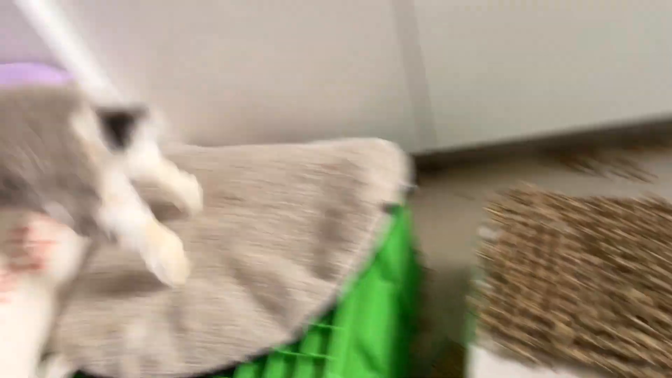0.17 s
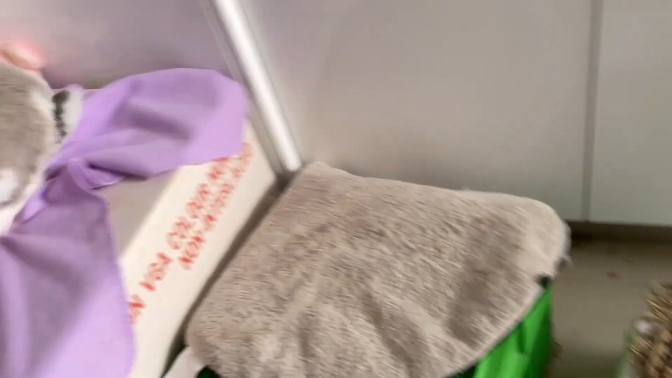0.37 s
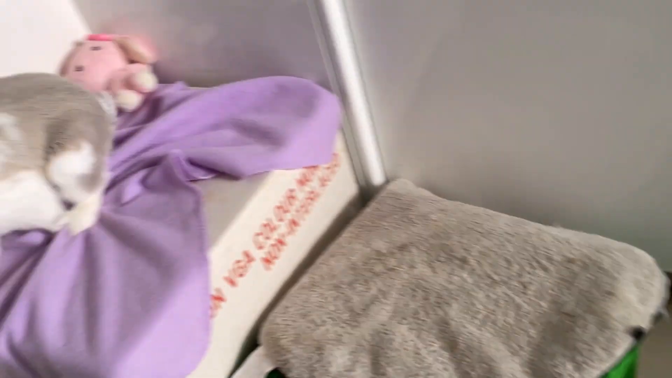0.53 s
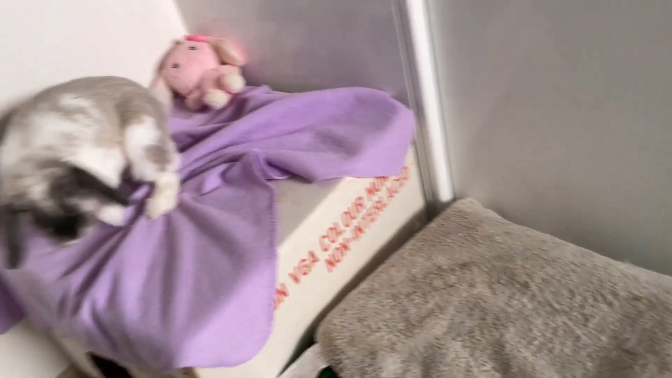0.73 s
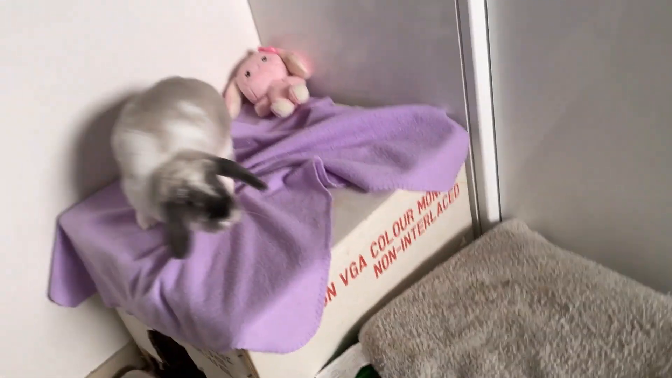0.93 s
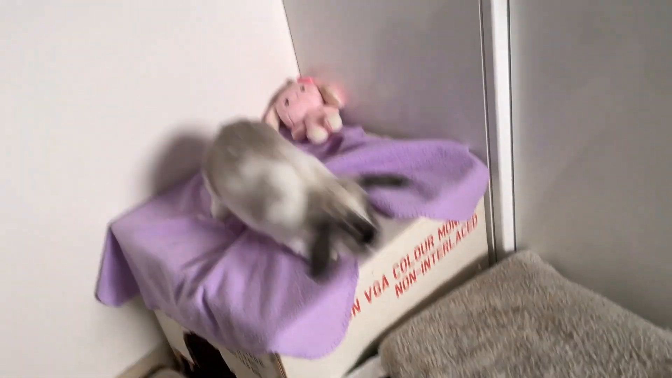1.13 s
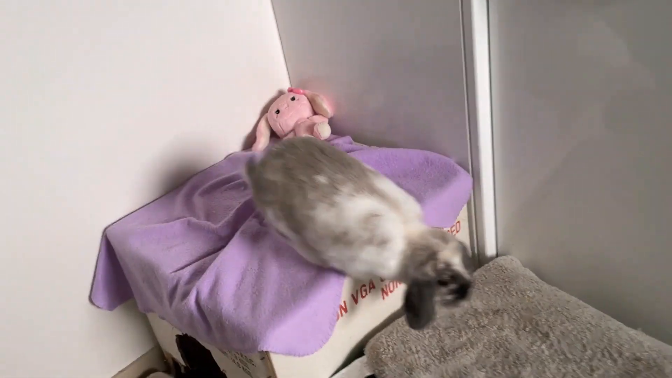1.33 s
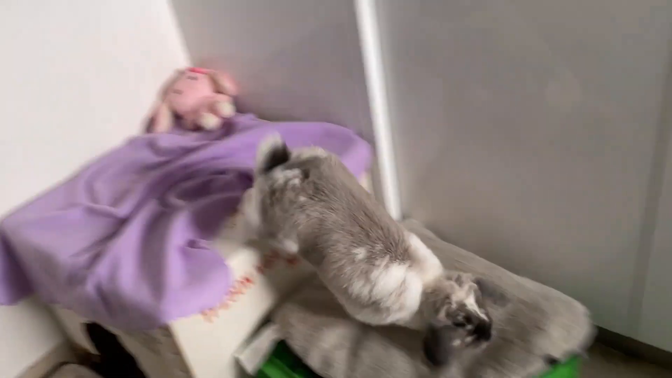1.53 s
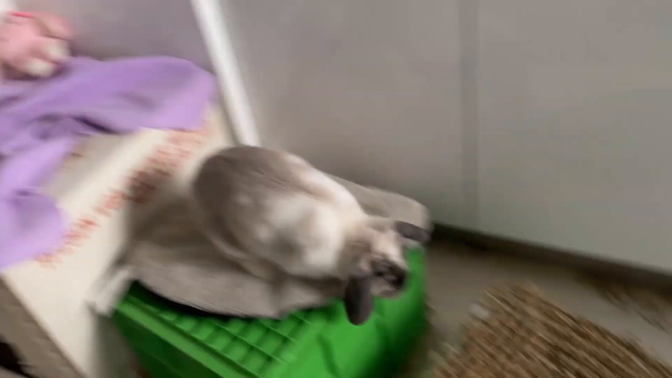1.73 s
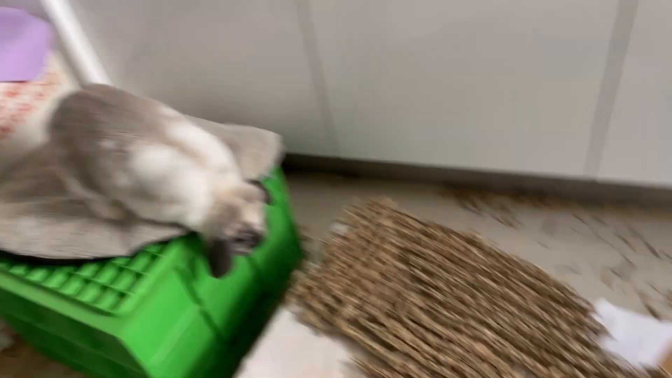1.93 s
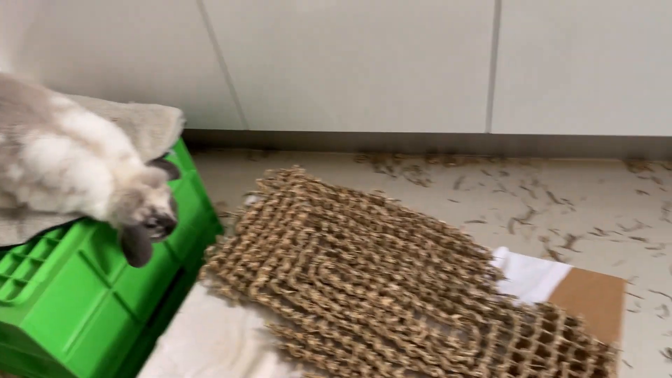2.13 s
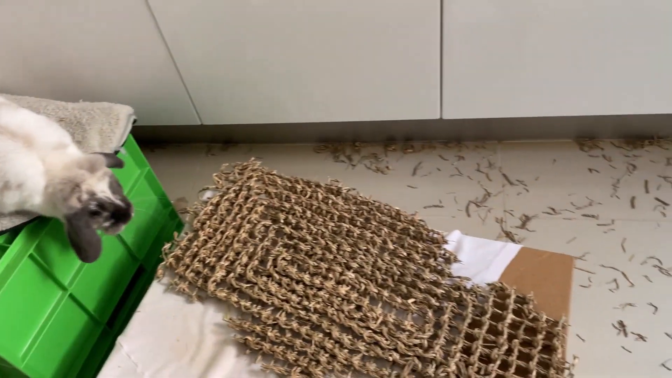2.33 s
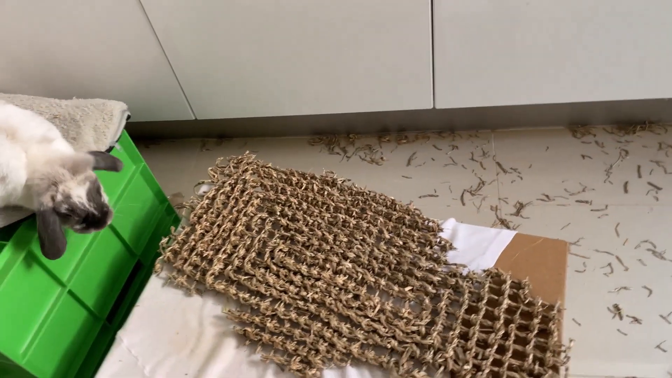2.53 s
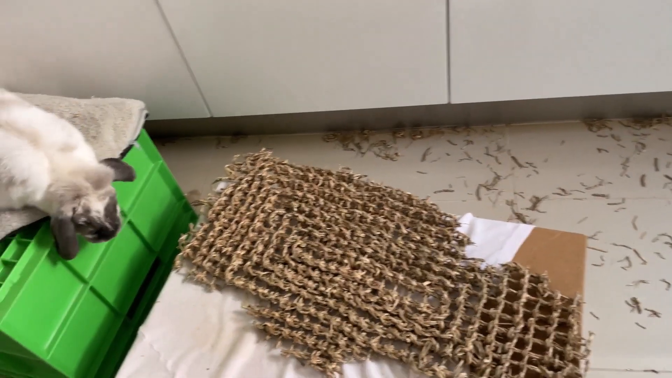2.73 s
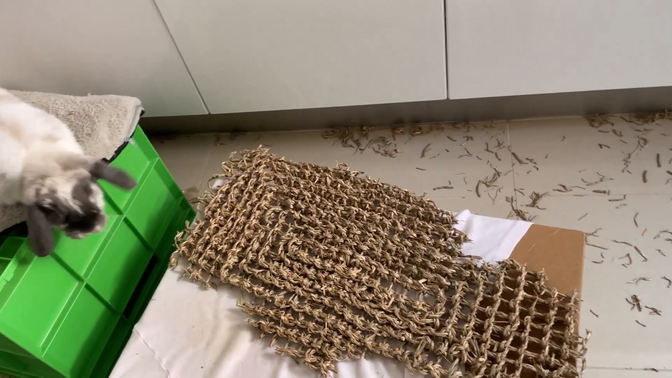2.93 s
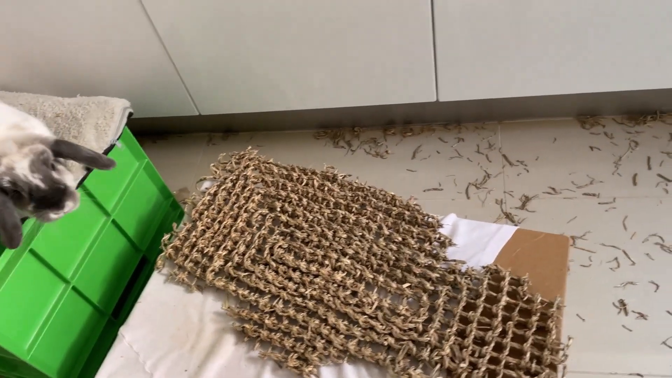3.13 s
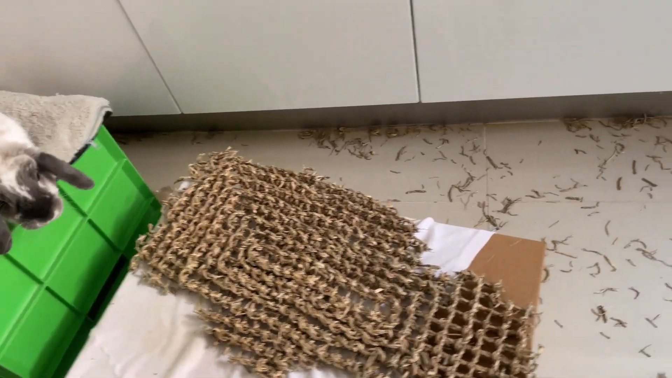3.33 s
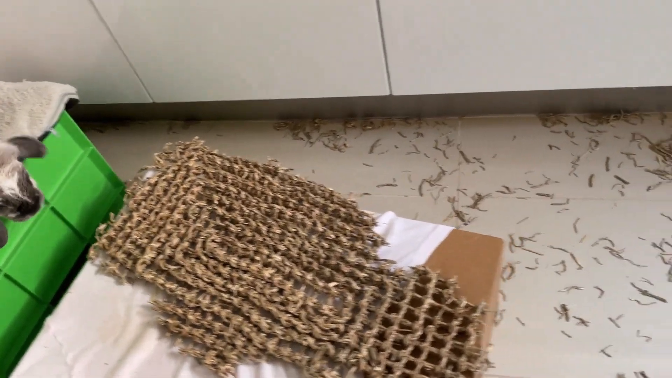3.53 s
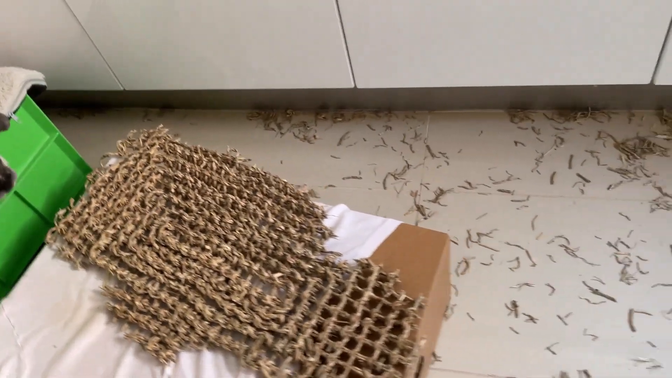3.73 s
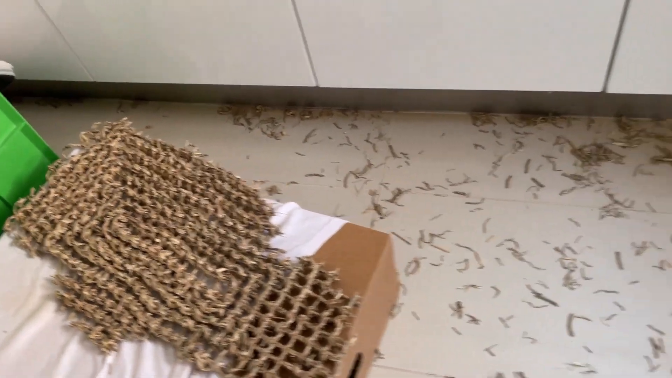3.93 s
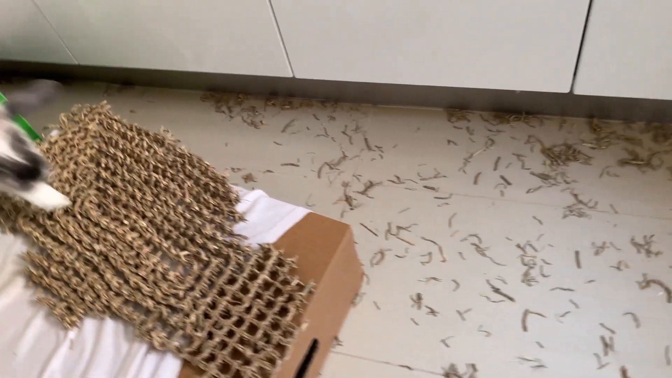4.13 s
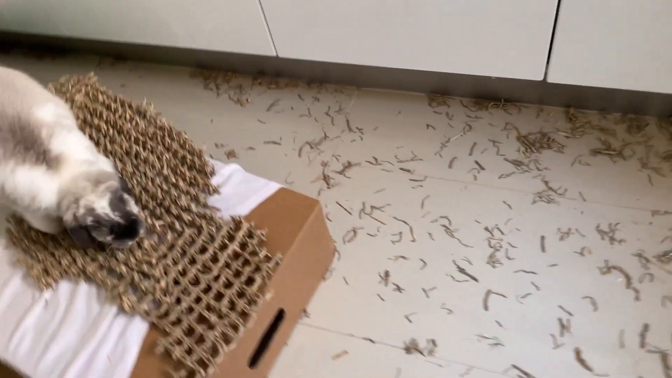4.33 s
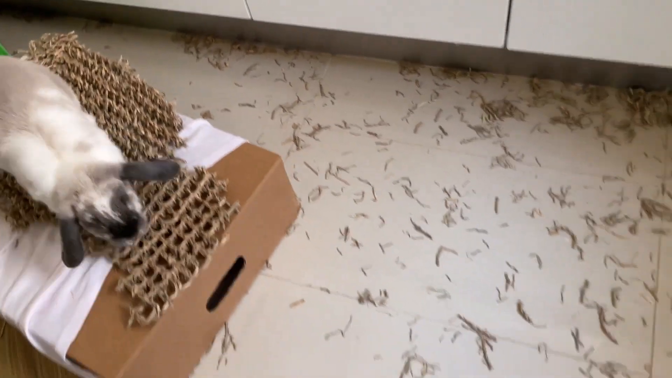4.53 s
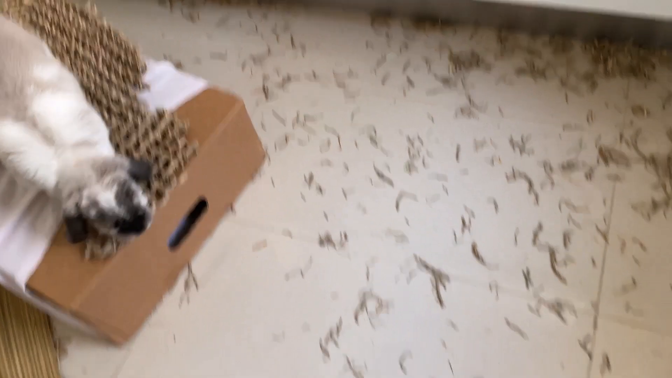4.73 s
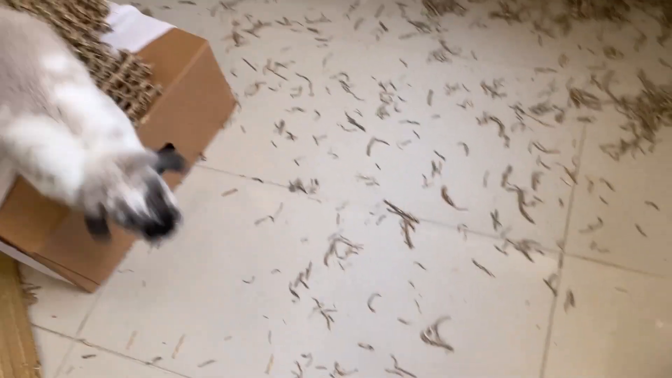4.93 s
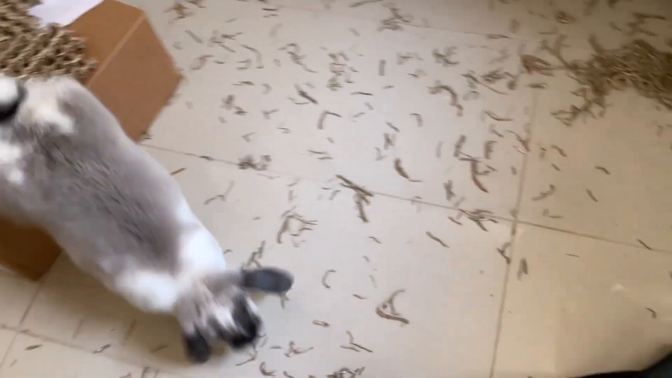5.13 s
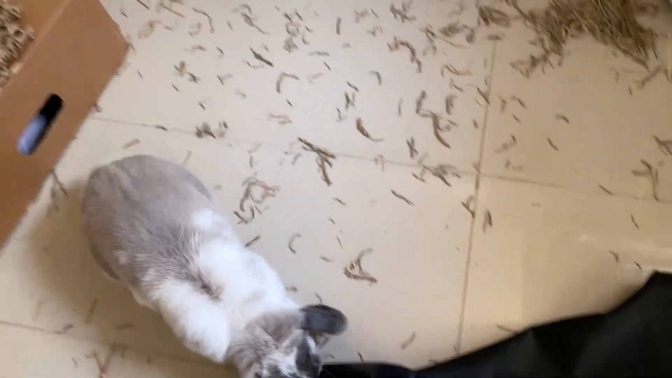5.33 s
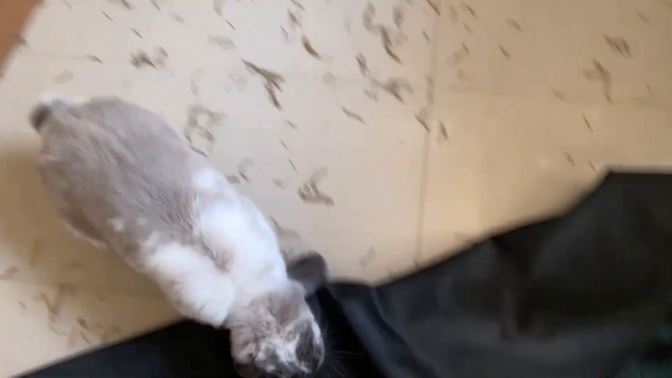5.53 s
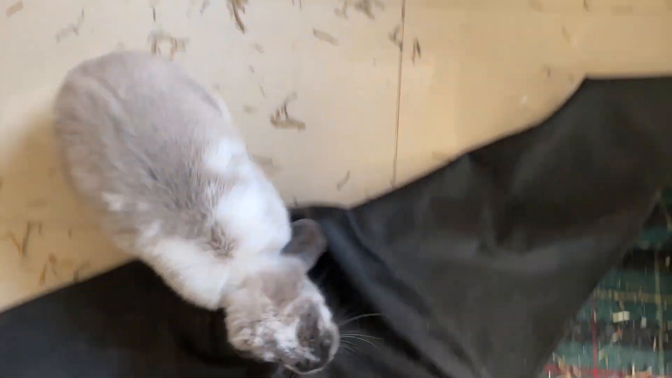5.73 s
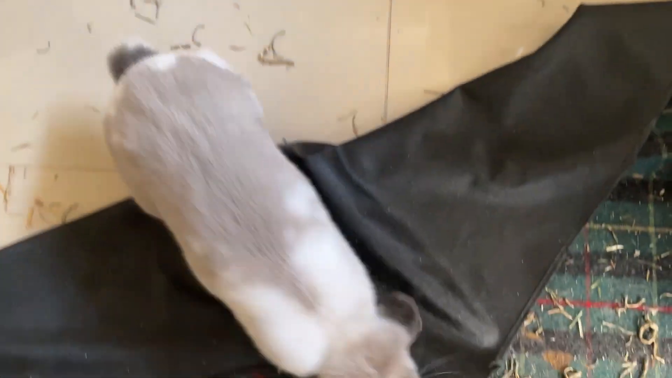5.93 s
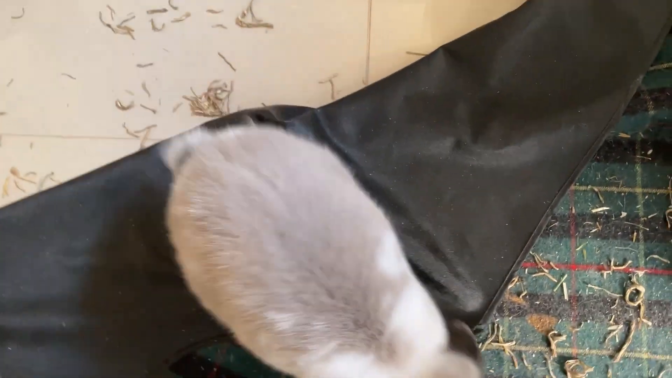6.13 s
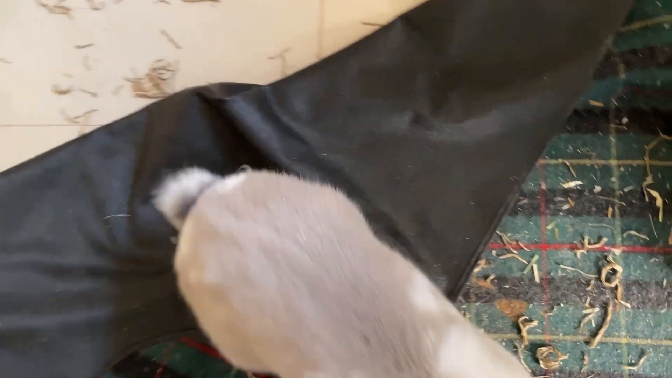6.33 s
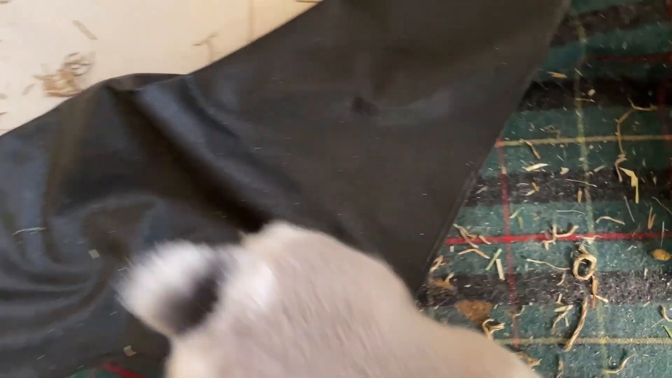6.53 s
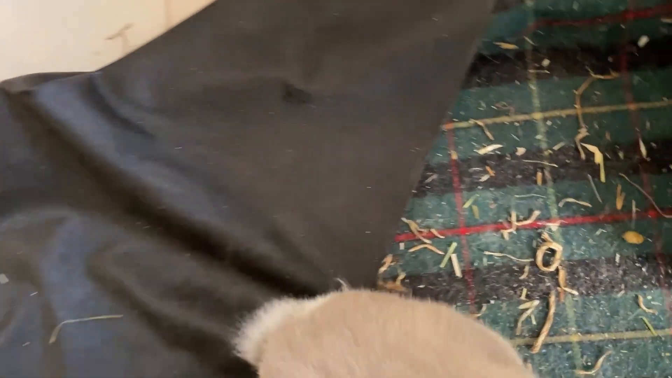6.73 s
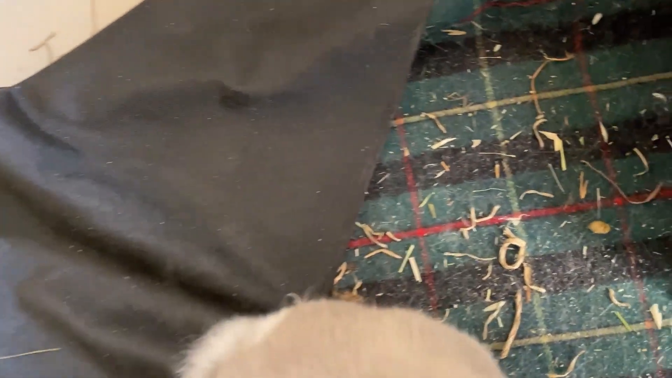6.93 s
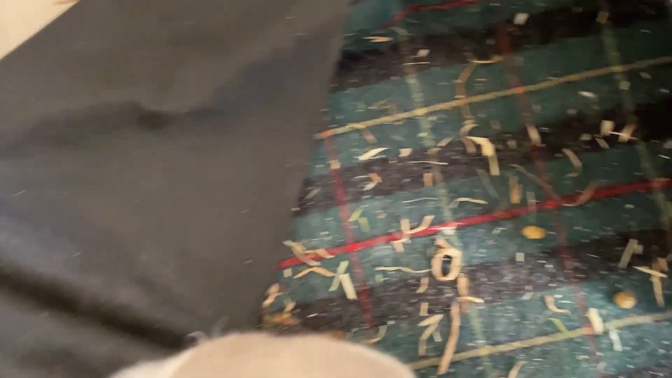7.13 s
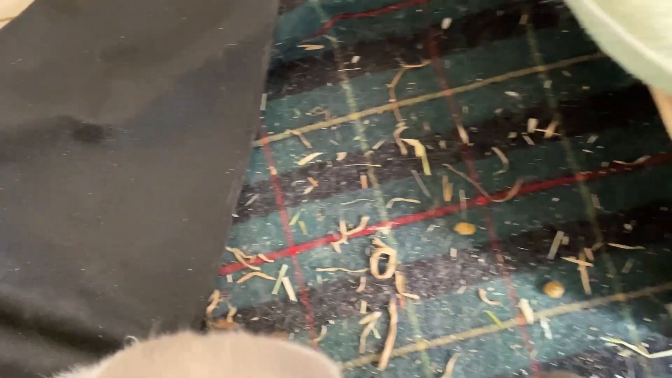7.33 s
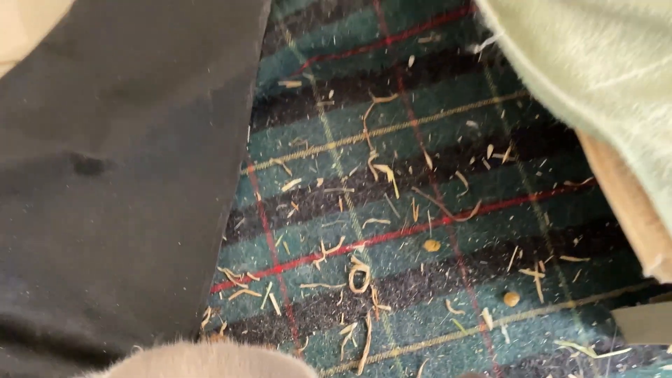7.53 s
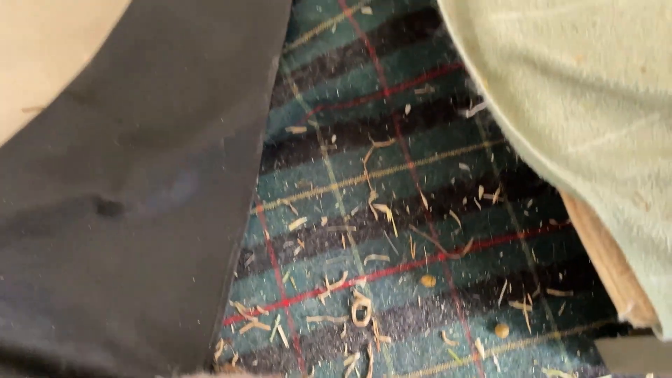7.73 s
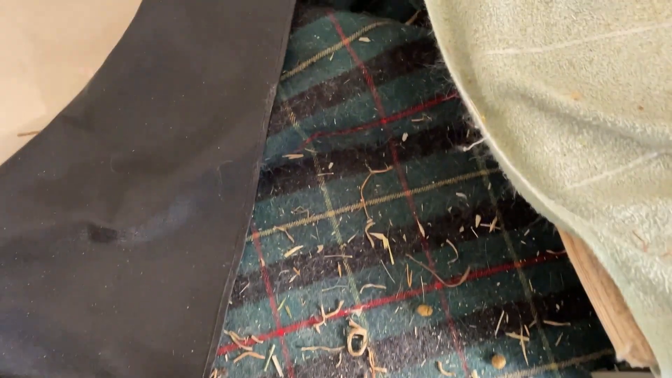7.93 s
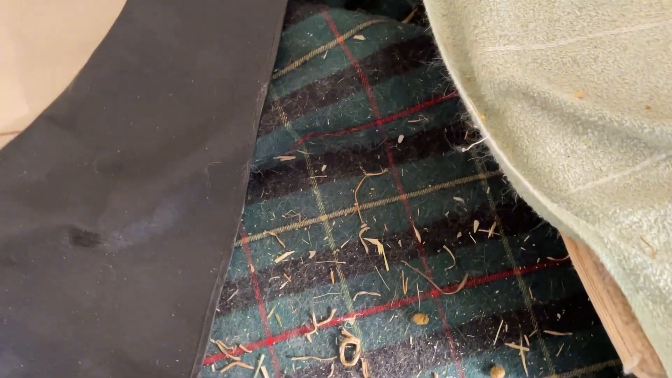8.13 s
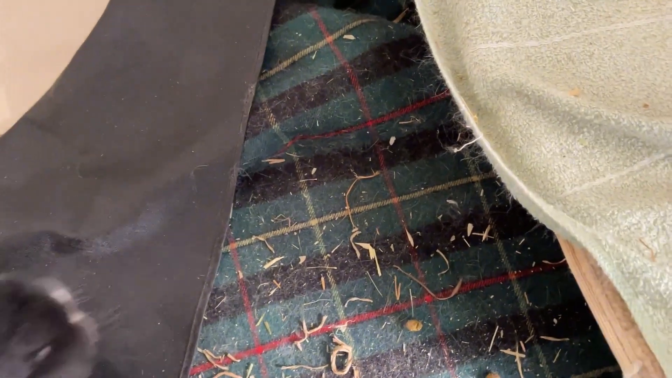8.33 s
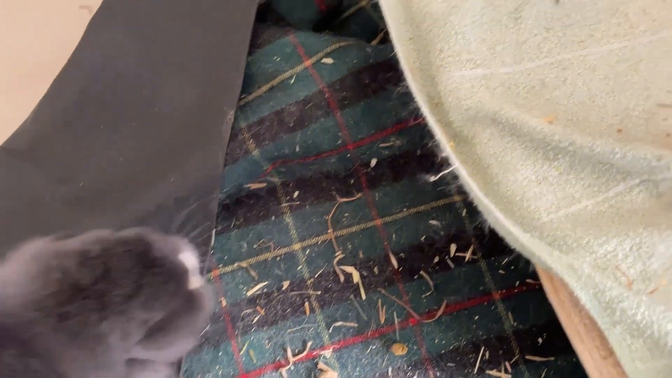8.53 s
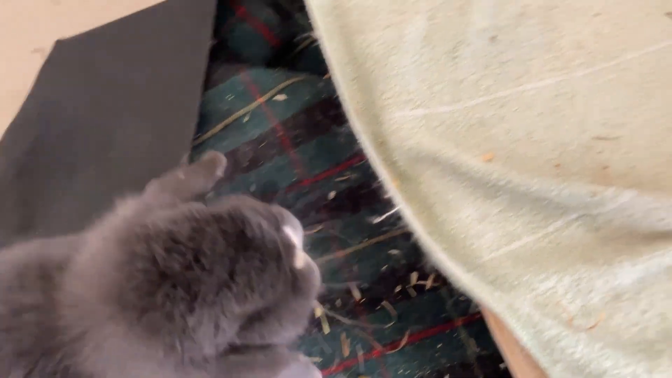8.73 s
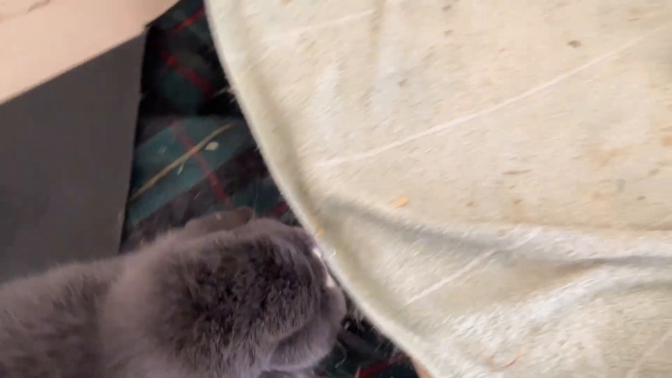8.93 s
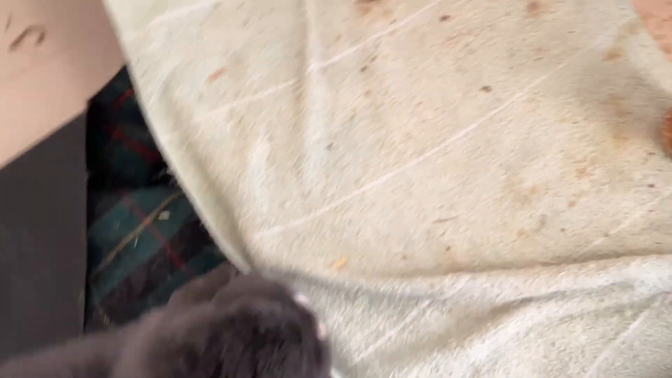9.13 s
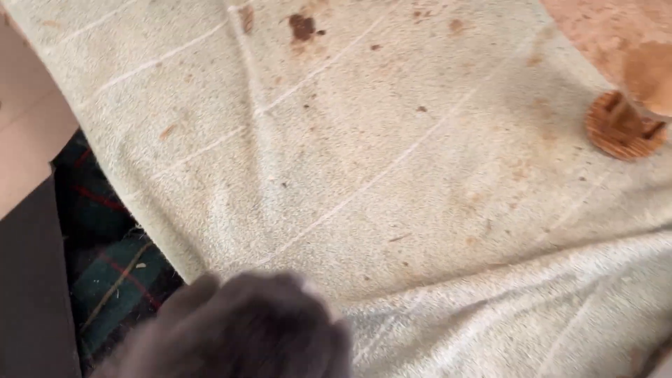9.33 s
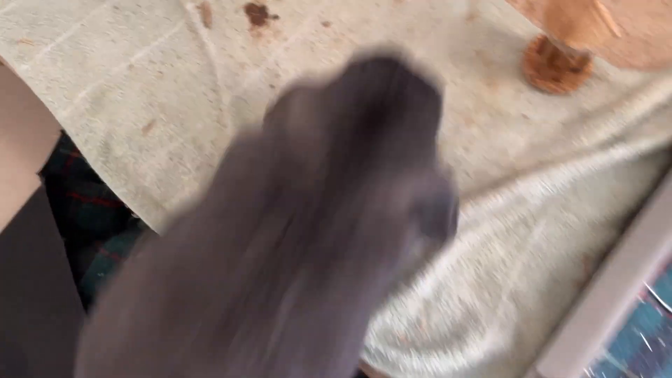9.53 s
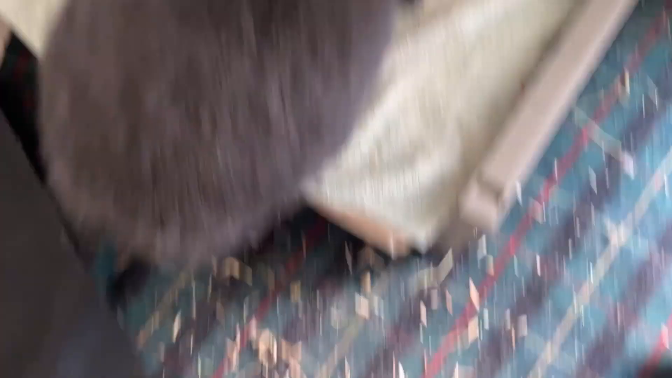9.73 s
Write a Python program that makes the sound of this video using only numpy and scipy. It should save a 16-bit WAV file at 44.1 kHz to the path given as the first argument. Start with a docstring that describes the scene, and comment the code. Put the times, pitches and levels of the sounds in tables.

```python
"""Paws thump on hollow furniture as pet rabbits hop about a small room: from a cloth-covered carton onto
a plastic crate, over a straw mat on a box, then across tiles onto a sheet and a blanket strewn with hay.
Thumps are low ringing tones; claw taps and snapping stalks are short puffs of coloured noise.
Sliding feet, dry fibres, fur and cloth are noise and runs of tiny crackles; bodies settle in low noise.
Late on, a small hard thing ticks and rings. A faint rumble and the room's echo lie around it all."""
import sys
import numpy as np
from scipy import signal
from scipy.fft import rfft, irfft, next_fast_len
from scipy.io import wavfile
from scipy.ndimage import uniform_filter1d, map_coordinates

SR = 44100
rng = np.random.default_rng(int(sys.argv[2]) if len(sys.argv) > 2 else 0)


def store_pcm(level_fs):
    """Save levels as 16-bit WAV."""
    pcm = np.round(np.clip(level_fs, -1, 1) * 32767).astype(np.int16)
    wavfile.write(sys.argv[1], SR, np.atleast_2d(pcm).T)


N = 435708

# Claws on hard ground. Each row: start in seconds, level in dB before a fixed trim, centre in Hz.
CLAW_TAPS = [(0.517, -41, 394), (1.005, -46.5, 477), (1.119, -55, 900), (1.26, -49, 794),
             (1.445, -32, 1660), (1.464, -35, 740), (4.261, -40, 640), (4.444, -47.5, 557),
             (4.473, -41, 606), (4.543, -47, 495), (4.583, -42, 490), (4.817, -44, 467), (4.838, -36, 456),
             (4.94, -30.5, 412), (4.963, -33.5, 417), (5.071, -38, 501), (5.152, -40, 515),
             (5.793, -39, 800), (5.893, -34.5, 610), (5.911, -35.5, 820), (6.013, -45.5, 1270),
             (6.204, -41, 670), (6.235, -47, 1000), (7.459, -42.5, 1380), (7.489, -48, 1700),
             (8.141, -40.5, 990), (8.19, -50, 1320), (8.255, -54.5, 617), (8.352, -38.5, 450),
             (8.688, -37.5, 660)]
# When the mat is underfoot: from and until, in seconds; furniture before, floor after.
MAT_TIME = (4.08, 5.3)
# What each ground does to a paw: shuffle relative to the thump in dB, time for a claw tap to fall 60 dB in s.
GROUND_KINDS = {"furniture": (-18.5, 0.082), "mat": (-21.5, 0.15), "floor": (-17.5, 0.064)}
# Tone colour of dry straw. Each row: frequency in Hz, relative level in dB per Hz.
STRAW_COLOUR = [(400, -27), (1200, -6.5), (2200, -1), (3300, -1), (5000, -2.5), (7000, -3.5), (9000, -3.5),
                (12000, -2), (13500, -10), (15800, -13)]


def amp(db):
    """Turn dB into a plain multiplier."""
    return 10 ** (np.asarray(db) / 20)


def unit(x):
    """Scale a sound to an average (rms) level of 1."""
    return x / np.sqrt(np.mean(x ** 2) + 1e-20)


def along(points, hz):
    """Read a curve of (Hz, value) points, joined by straight lines on a log frequency axis."""
    point_hz, value = np.transpose(points)
    return np.interp(np.log(hz + 1), np.log(point_hz + 1), value)


def curves(rows):
    """Give one value per sample for each column after the time."""
    s, *columns = np.transpose(rows)
    t = np.arange(N) / SR
    return [np.interp(t, s, column) for column in columns]


def wobble(rate):
    """Draw a smooth random curve through so many random points a second."""
    points = rng.standard_normal(int(N * rate / SR) + 4)
    return map_coordinates(points, [np.arange(N) * rate / SR])


def filtered(x, response):
    """Multiply the spectrum of x by a response that depends on frequency."""
    n = x.shape[-1]
    padded = next_fast_len(n + 8192)
    spectrum = rfft(x, padded) * response(np.fft.rfftfreq(padded, 1 / SR))
    return irfft(spectrum, padded)[..., :n]


def spread(pair, colour_db):
    """Mix two unrelated signals into a coloured stereo pair of rms 1, as alike as each frequency asks."""
    # Likeness of left and right. Each row: frequency in Hz, correlation from -1 to 1.
    likeness = [(60, 0.8), (160, 0.91), (300, 0.27), (600, 0.19), (2000, 0.12), (5000, 0.29), (7000, -0.18),
                (8600, -0.81), (10500, -0.19), (14000, 1)]

    def mid_side(hz):
        turn = np.arccos(np.clip(along(likeness, hz), -1, 1)) / 2
        return amp(colour_db(hz)) * [np.cos(turn), np.sin(turn)]

    mid, side = filtered(pair, mid_side)
    return unit(np.array([mid + side, mid - side]))


def hump(hz, centre_hz, below_db, above_db):
    """Shape a rounded peak in dB whose two skirts fall by so many dB per octave."""
    octave = np.log2((hz + 1) / centre_hz)
    slope = np.where(octave < 0, below_db, above_db)
    return -slope * (np.hypot(octave, .5) - .5)


def add(track, s, sound):
    """Lay a sound into a track at time s, in seconds."""
    start = max(round(s * SR), 0)
    part = sound[..., :max(N - start, 0)]
    track[..., start:start + part.shape[-1]] += part


def crackle(size, rate, scatter_db, life):
    """Fibres slip at random moments, rate a second; each slip is a noise burst of random size, life in s."""
    happens = rng.random(size) < rate / SR
    slips = happens * amp(scatter_db * np.minimum(rng.exponential(size=size), 4))
    power = signal.lfilter([1], [1, -np.exp(-1 / (life * SR))], slips)
    return unit(np.sqrt(power) * rng.standard_normal((2, size)))


def burst(db, t60, rise, colour_db):
    """A quickly dying stereo puff of coloured noise, led by a short crack."""
    t = np.arange(SR // 4) / SR
    noise = spread(rng.standard_normal((2, len(t))), colour_db)
    puff = amp(1.0 - 60 * t / t60)
    crack = amp(-6) * np.exp(-t / 0.0017)
    return amp(db) * (puff + crack) * (1 - np.exp(-t / rise)) * noise


def strokes(rows, rise, t60):
    """Loudness of overlapping (s, length s, dB) movements: each rises, holds and dies away."""
    power, t = np.zeros(N), np.arange(SR) / SR
    for s, length, db in rows:
        fall_db = 60 * np.maximum(t - length, 0) / t60
        add(power, s, (np.minimum(t / rise, 1) * amp(db - fall_db)) ** 2)
    return np.sqrt(power)


def room(x, wet_db):
    """Tiles and cupboard doors answer after 5 ms, each frequency dying at its own speed."""
    # How long the echo lasts. Each row: frequency in Hz, time to fall 60 dB in seconds.
    echo_time = [(60, 0.5), (160, 0.2), (1000, 0.37), (3000, 0.3), (12000, 0.17)]
    hz, t, grid = signal.stft(rng.standard_normal((2, SR // 2)), SR, nperseg=256)
    fade = amp(-60 * t / along(echo_time, hz)[:, None])
    tail = signal.istft(grid * fade, SR, nperseg=256)[1]
    tail = spread(tail, np.zeros_like) / np.sqrt(tail.shape[1])
    tail = np.pad(tail, ((0, 0), (SR // 200, 0)))
    return x + amp(wet_db) * signal.fftconvolve(x, tail, axes=1)[:, :N]


def ground(s):
    """Tell what is underfoot at time s."""
    return "furniture" if s < MAT_TIME[0] else "mat" if s < MAT_TIME[1] else "floor"


def panels(hz):
    """The carton panels under the mat ring: each resonance lifts the dB around its own frequency."""
    # Carton panel resonances. Each row: frequency in Hz, width in Hz, lift in dB.
    carton_modes = [(426, 43, 5), (492, 18, 13), (706, 31, 12.5), (816, 50, 0), (1078, 24, 10.5),
                    (1320, 160, 4.5)]
    return sum(db / (1 + (2 * (hz - centre) / width) ** 2) for centre, width, db in carton_modes)


def landings():
    """List every landing, and the soft step in which the paw's weight follows each claw tap on the floor."""
    # Paws landing. Each row: start in seconds, level in dB, centre of the boom in Hz,
    # knock in dB relative to that level (the boom has a fixed trim).
    paw_falls = [(0.023, -28, 140, -28), (0.244, -26, 108, -33.5), (0.298, -24.5, 162, -17),
                 (0.344, -19.5, 107, -21.5), (0.429, -35, 111, -15), (0.512, -17.5, 166, -13),
                 (0.618, -41, 110, -9), (0.878, -33, 129, -28), (0.999, -24, 157, -21),
                 (1.121, -34, 157, -23), (1.185, -29.5, 162, -20), (1.261, -33, 175, -20),
                 (1.369, -29.5, 157, -18), (1.448, -21.5, 160, -40), (1.566, -31, 199, -20),
                 (1.673, -40, 200, -15), (1.744, -23, 130, -34), (1.784, -31.5, 127, -26),
                 (4.165, -29.5, 210, -21), (4.262, -18, 150, -30), (4.294, -31.5, 78, -19),
                 (4.433, -27, 132, -14), (4.474, -29, 200, -14), (4.574, -32, 126, -15),
                 (4.867, -38, 218, -3), (4.945, -27.5, 202, -6.5), (5.188, -40, 76, -6),
                 (5.338, -31.5, 111, -21), (6.221, -45, 112, -20), (6.355, -43, 65, -15),
                 (6.553, -41, 80.4, -20), (6.74, -39, 63.6, -18), (6.935, -44, 67, -26),
                 (7.109, -51.5, 67, -17), (7.405, -50.5, 70, -30), (8.168, -49, 65, -16),
                 (8.348, -34, 150, -19), (8.56, -47, 70, -12), (8.698, -44.5, 70, -17),
                 (8.94, -49, 70, -18), (9.251, -44, 121, -14), (9.499, -40, 108, -16.5),
                 (9.615, -41, 150, -25), (9.71, -45.5, 75, -21)]
    lag_s, db, boom_hz, knock_db = 0.01175, -53.5, 73, -15
    steps = [(s + lag_s, db, boom_hz, knock_db) for s, _, _ in CLAW_TAPS if ground(s) == "floor"]
    return list(paw_falls) + steps


def rustle():
    """Moving bodies rub in a soft hush, dry fibres crackle finely, and bodies drag over cloth or mat."""
    # Soft hush of fur and cloth. Each row: time in seconds, then middle and treble levels in dB before trims.
    hush = [(0, -72.5, -74), (0.8, -71.5, -79), (1.1, -70, -74.5), (1.65, -69.5, -76.5), (2.18, -73.5, -85),
            (2.26, -84.5, -92), (2.55, -85.5, -89.5), (2.88, -68, -73.5), (3.35, -65, -71),
            (4.02, -78.5, -75), (4.3, -66, -74), (5.1, -58, -76.5), (5.5, -78.5, -79.5),
            (5.75, -69.5, -74.5), (6.15, -70.5, -73), (6.63, -61.5, -66.5), (7.3, -80, -77.5),
            (7.5, -68.5, -70.5), (7.78, -84, -83.5), (8.05, -70.5, -71.5), (8.3, -81, -80.5),
            (8.57, -68.5, -74.5), (8.8, -76, -77.5), (9.22, -68.5, -66), (9.45, -74, -71.5),
            (9.75, -66.5, -70), (9.88, -69.5, -68.5)]
    # Bodies dragging. Each row: start in seconds, length in seconds, level in dB before trims.
    drags = [(0.29, .08, -53), (0.51, 0.068, -62), (1.43, 0.12, -54.5), (4.1, 0.1, -58.5),
             (4.26, 0.041, -55.5), (4.44, 0.24, -56.5), (4.7, 0.21, -57.5), (4.94, .22, -53)]
    # Tone colour of rubbing cloth. Each row: frequency in Hz, relative level in dB per Hz.
    rub_colour = [(120, -24), (200, -3.5), (274, -4), (353, -1.5), (385, -2), (1010, -2.5), (1350, -2),
                  (2090, -9.5), (6000, -29.5), (7800, -28), (13200, -120)]
    # Tone colour of scraping on the mat, panels aside. Each row: frequency in Hz, relative level in dB per Hz.
    scrape_colour = [(150, 2), (280, 4), (450, -2.5), (800, -4.5), (1300, -11.5), (2000, -19), (4000, -34),
                     (9000, -53)]
    middle_db, treble_db = curves(hush)
    pressure, t = wobble(22), np.arange(N) / SR
    drag = strokes(drags, rise=0.014, t60=0.36)

    rub = spread(crackle(N, rate=3500, scatter_db=7, life=0.0019), lambda hz: along(rub_colour, hz))
    # on the mat, coarser slips sound through the carton beneath
    crunch = crackle(N, rate=250, scatter_db=4.5, life=.002)
    scrape = spread(crunch, lambda hz: along(scrape_colour, hz) + panels(hz))
    on_mat = ((t > MAT_TIME[0]) & (t < MAT_TIME[1])) * 1.
    on_mat = uniform_filter1d(on_mat, SR // 20)  # blend over 50 ms
    texture = (1 - on_mat) * rub + on_mat * amp(3.1) * scrape
    body = np.hypot(amp(middle_db + 3.5), drag) * amp(1.02 * pressure) * texture

    hiss = spread(rng.standard_normal((2, N)), lambda hz: along(STRAW_COLOUR, hz))
    slips = crackle(N, rate=70, scatter_db=6.5, life=.001)
    fibres = spread(slips, lambda hz: along(STRAW_COLOUR, hz))
    fibre_level = np.hypot(amp(treble_db), amp(-11) * drag) * amp(0.95 * pressure)
    return body + fibre_level * (amp(3.5) * hiss + amp(-3.5) * room(fibres, wet_db=-4.5))


def shuffle():
    """Bodies settle after each landing, over a steady rumble; furniture and mat boom higher than the floor."""
    # Tone colour of floor and rumble. Each row: frequency in Hz, relative level in dB per Hz.
    floor_colour = [(15, -43), (25, -8), (64, 8.5), (141, -4.5), (233, -7), (264, -14), (303, -18),
                    (500, -19), (650, -33), (1100, -120)]
    rise_s, t60_s, rumble_db = 0.019, 0.48, -72
    floor = spread(rng.standard_normal((2, N)), lambda hz: along(floor_colour, hz))
    hollow = spread(rng.standard_normal((2, N)), lambda hz: hump(hz, 139, below_db=4, above_db=18.5))
    settling = [(s, rise_s, db + GROUND_KINDS[ground(s)][0]) for s, db, _, _ in landings()]
    on_hollow = strokes([row for row in settling if ground(row[0]) != "floor"], rise_s, t60_s)
    on_floor = strokes([row for row in settling if ground(row[0]) == "floor"], rise_s, t60_s)
    return on_hollow * hollow + np.hypot(on_floor, amp(rumble_db)) * floor


def scuffs():
    """A foot slides or pushes off and catches a dense run of fibres, swelling and fading smoothly."""
    # Each row: strongest moment in seconds, half length in seconds, level in dB, centre in Hz,
    # skirt on both sides in dB per octave.
    slides = [(0.03, 0.015, -69, 2500, 3), (0.316, .024, -45, 5350, 7.5), (0.328, .026, -46, 640, 27),
              (0.541, 0.01, -51, 600, 26), (0.559, .02, -54.5, 5060, 7), (0.962, .07, -64.5, 5060, 3),
              (1.287, 0.014, -68, 4500, 19), (1.408, .012, -44, 6000, 4.5), (1.451, .018, -43.5, 3200, 10),
              (1.531, .04, -50, 2000, 0), (2.776, .03, -68.5, 11000, 10), (3.72, 0.032, -63.5, 950, 15),
              (3.913, .017, -56, 9150, 4.5), (4.16, .032, -34.5, 206, 27.5), (4.29, .022, -56.5, 900, 6.5),
              (5.086, .055, -52.5, 2500, 1), (5.349, 0.017, -63, 2000, -1), (5.468, 0.0091, -65, 12100, 34),
              (5.683, .04, -63.5, 11100, 1), (7.005, .025, -55, 10900, 25), (7.016, .025, -62, 4200, 29),
              (7.223, 0.026, -69, 4800, 18), (7.366, .024, -59, 970, 8), (8.587, 0.028, -64, 5040, 7),
              (9.268, 0.023, -58.5, 696, 7)]
    out = np.zeros((2, N))
    for s, half, db, centre_hz, skirt_db in slides:
        t = np.arange(-3 * half, 3 * half, 1 / SR)
        grains = crackle(len(t), rate=2100, scatter_db=8.5, life=0.0037)
        # below 2200 Hz the straw colour stays flat
        treble_db = lambda hz: along(STRAW_COLOUR, np.maximum(hz, 2200))
        grains = spread(grains, lambda hz: treble_db(hz) + hump(hz, centre_hz, skirt_db, skirt_db))
        # thin fibres radiate little bass
        grains = filtered(grains, lambda hz: hz ** 2 / (hz ** 2 + 300 ** 2))
        add(out, s + t[0], amp(db) * np.exp(-(t / half) ** 2 / 2) * grains)
    return room(out, wet_db=-16.5)


def thumps():
    """Padded paws ring the low tones of box and floor; each also knocks the higher ones, by its own amount."""
    # Tones of the hollow box and floor. Each row: frequency in Hz, average level in dB,
    # time to fall 60 dB in seconds.
    box_modes = [(61.8, -1.5, 0.73), (72.8, 5, 0.26), (84.5, 3, 0.24), (113.9, 3, 0.22), (127.7, 3, 0.16),
                 (147.4, 1, 0.14), (165.7, 5.5, 0.18), (205.3, 2, 0.2), (241.2, 0.5, 0.18),
                 (261.6, -1, 0.36), (288, 8, 0.1), (337.2, 0.5, 0.18), (373, 2, 0.14), (415.3, -5.5, 0.15),
                 (488, -4, 0.1), (665, -6, 0.2)]
    out, t = np.zeros((2, N)), np.arange(SR // 2) / SR
    hz, level, t60 = np.transpose(box_modes)[:, :, None]
    high = hz > 280  # tones above this belong to the knock
    for s, db, centre_hz, knock_db in landings():
        strength = amp(level + rng.normal(0, 1.3, hz.shape))
        boom = ~high * strength * amp(hump(hz, centre_hz, below_db=19.0, above_db=25.5))
        knock = high * strength
        boom_weight = amp(-3.5) * boom / np.linalg.norm(boom)
        knock_weight = amp(knock_db) * knock / np.linalg.norm(knock)
        sign = rng.choice([-1, 1], hz.shape)  # where the paw lands on each mode shape
        swell = 1 - np.exp(-t * hz / 0.54)  # a soft paw takes most of a cycle to start a tone
        tones = swell * amp(-60 * t / t60) * np.sin(2 * np.pi * hz * t)
        add(out, s, amp(db) * (sign * (boom_weight + knock_weight) * tones).sum(0))
    return room(out, wet_db=-16.5)


def snaps():
    """Single stalks break with a short puff of noise; each has a few weak resonances of its own."""
    # Stalks snapping. Each row: start in seconds, level in dB before a fixed trim, centre in Hz.
    breaks = [(0.2312, -48, 5330), (0.8682, -43, 2550), (1.2542, -34.5, 4230), (1.3973, -31.5, 4390),
              (1.4362, -27.5, 6970), (1.4444, -23, 3060), (1.586, -35, 2500), (1.8008, -47.5, 3380),
              (4.4456, -39.5, 5650), (4.8174, -39.5, 3730), (4.84, -40.5, 2620), (4.9454, -37.5, 3670),
              (4.961, -37, 3420), (5.152, -42, 2800), (5.892, -43, 2700), (6.5334, -41.5, 11200),
              (6.8438, -44, 2520), (6.9234, -42.5, 2700), (7.4587, -41.5, 3100), (7.49, -40.5, 4370),
              (8.082, -44, 11600), (8.5036, -51, 2520), (8.529, -47, 4900), (8.6879, -47.5, 3200)]
    out = np.zeros((2, N))
    for s, db, centre_hz in breaks:
        stalk_hz = centre_hz * np.exp(rng.normal(0, 0.451, 4))
        stalk_db = lambda hz: np.max([6 / (1 + (18 * (hz / c - 1)) ** 2) for c in stalk_hz], axis=0)
        colour_db = lambda hz: hump(hz, centre_hz, below_db=6.0, above_db=6.5) + stalk_db(hz)
        add(out, s, burst(db - 6.5, t60=0.039, rise=0.0014, colour_db=colour_db))
    return room(out, wet_db=-3.5)


def taps():
    """Claws knock on cardboard, tiles and the sheet as noise puffs; on the mat the carton colours them."""
    out = np.zeros((2, N))
    for s, db, centre_hz in CLAW_TAPS:
        _, t60 = GROUND_KINDS[ground(s)]
        carton = ground(s) == "mat"
        colour_db = lambda hz: hump(hz, centre_hz, below_db=10, above_db=13.5) + carton * panels(hz)
        add(out, s, burst(db - 4.0, t60, rise=0.00028, colour_db=colour_db))
    return room(out, wet_db=-8.5)


def ticks():
    """Light touches on a small hard thing ring the same few tones at new strengths."""
    # Touches. Each row: start in seconds, level in dB before a fixed trim.
    touches = [(8.0676, -53), (8.458, -49.5), (8.532, -49), (8.5738, -52.5)]
    # Tones of the small hard thing. Each row: frequency in Hz, average level in dB, time to fall 60 dB in s.
    tick_tones = [(1470, 6, .06), (1570, 12.5, 0.065), (1610, -14, 0.053), (3100, -12, .063),
                  (3380, -3, 0.059), (4100, -10, .059), (4940, 2, 0.03), (4960, 1, 0.032), (5200, 6, 0.028)]
    out, t = np.zeros((2, N)), np.arange(SR // 3) / SR
    hz, level, t60 = np.transpose(tick_tones)[:, :, None]
    for s, db in touches:
        touch_db = rng.normal(0, 2, (2, *hz.shape))  # differs between left and right
        tones = amp(level + touch_db - 60 * t / t60) * np.sin(2 * np.pi * hz * t)
        add(out, s, amp(db - 16.5) * tones.sum(1))
    return room(out, wet_db=-5)


def scene():
    """Add up all the sounds; the left microphone port is a little more sensitive in the upper middle."""
    sound = rustle() + shuffle() + scuffs() + thumps() + snaps() + taps() + ticks()
    lean = [(120, -1.0), (500, 0.0), (2500, 2.5), (8000, 0.7)]  # (Hz, left minus right dB)
    return filtered(sound, lambda hz: amp(np.outer([.5, -.5], along(lean, hz))))


def record(dry):
    """The hand-held camera weakens the deepest bass and keeps nothing above its band limit."""
    low_hz, top_hz, damping = 42.2, 15850, 0.96

    def low_cut(hz):
        swing = 1j * hz
        return swing ** 2 / (swing ** 2 + damping * swing * low_hz + low_hz ** 2)

    return filtered(dry, lambda hz: (hz < top_hz) * low_cut(hz))


dry = scene()
out = record(dry)
store_pcm(out)
```